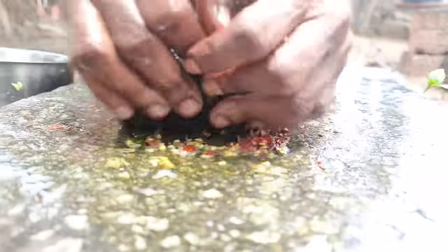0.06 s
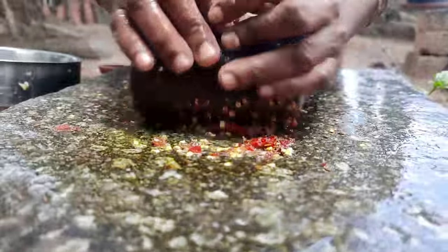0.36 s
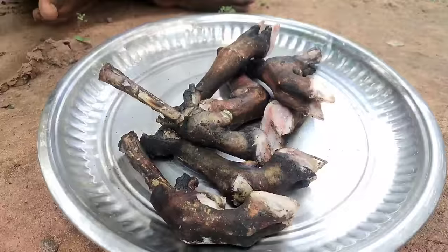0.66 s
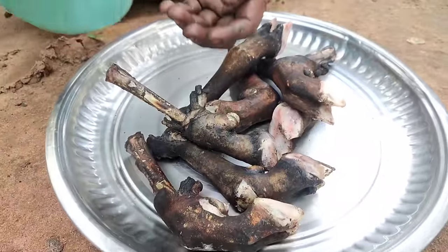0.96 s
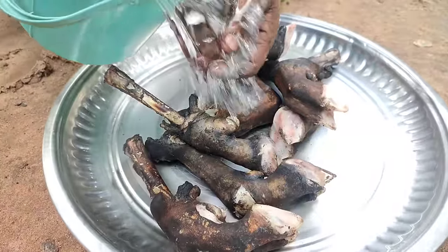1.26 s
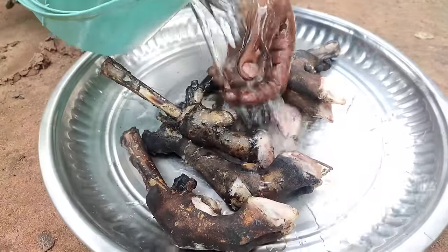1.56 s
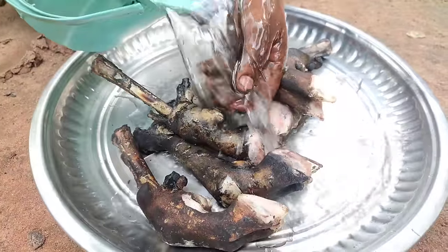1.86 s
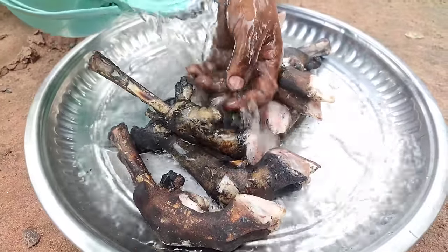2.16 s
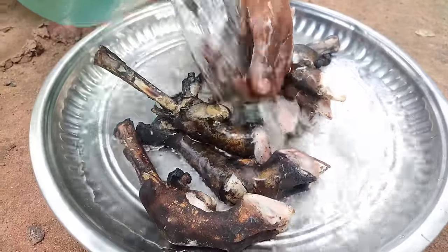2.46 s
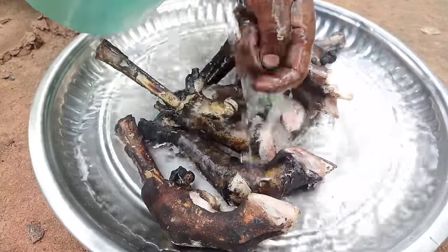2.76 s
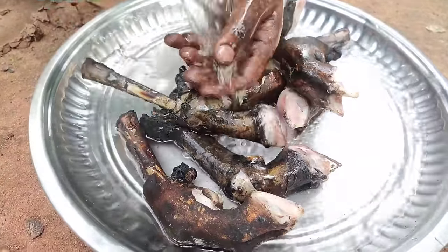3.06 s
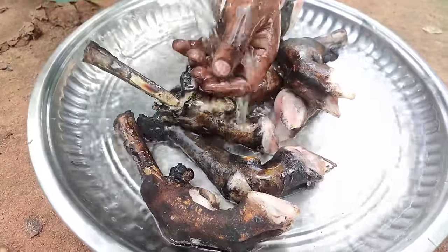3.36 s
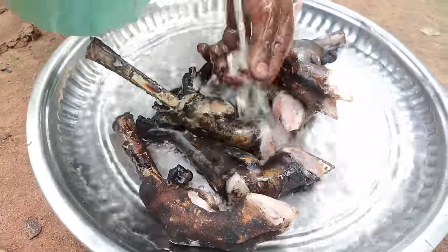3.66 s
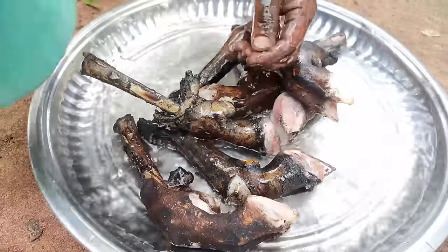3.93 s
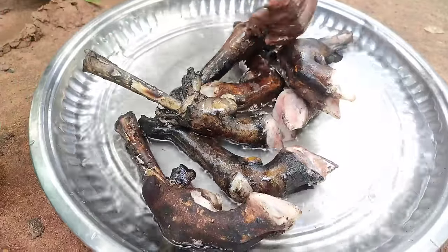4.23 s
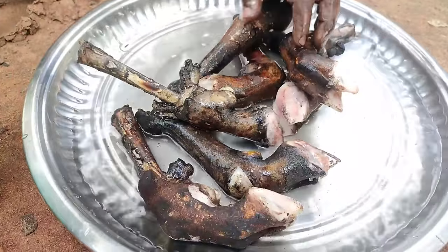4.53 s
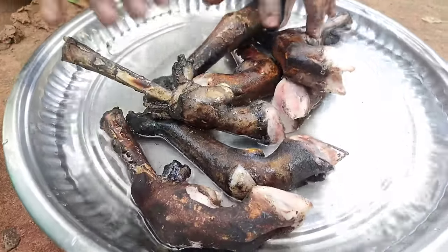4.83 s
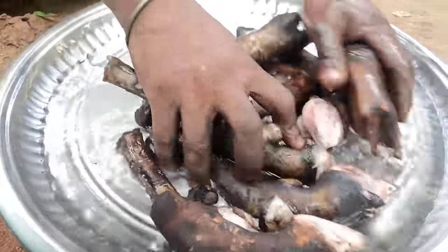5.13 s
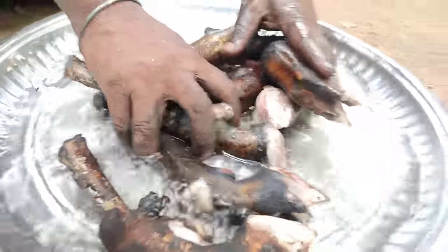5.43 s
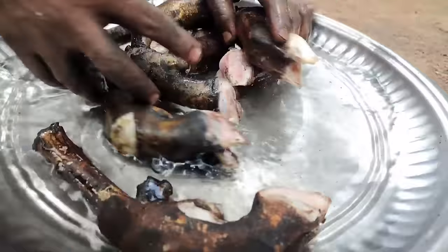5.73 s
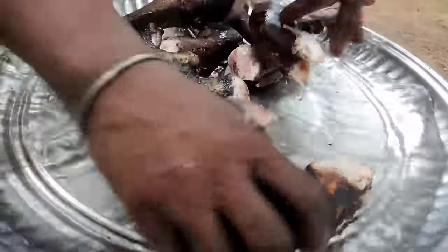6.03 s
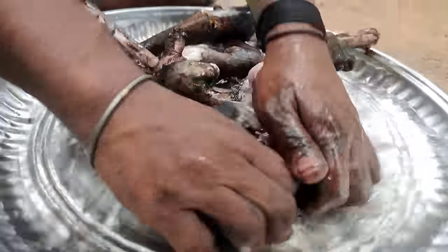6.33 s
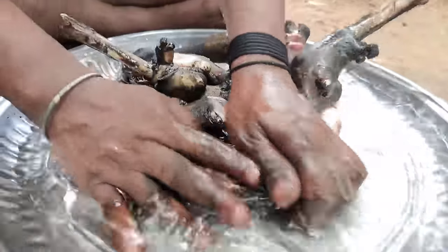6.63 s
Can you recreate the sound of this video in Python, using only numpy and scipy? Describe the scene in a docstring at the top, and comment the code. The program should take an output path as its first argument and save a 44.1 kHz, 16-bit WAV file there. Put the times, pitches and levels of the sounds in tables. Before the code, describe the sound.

For the first 0.7 seconds, a hand stone grinds wet spices on a slab: about four quick, gritty strokes with a low rumble and soft bumps. A lull follows, with a light tap and faint outdoor hiss. At about 1.4 seconds, water starts pouring from a jug over a hand and meat in a wide steel plate, close and slightly to the right, with bright splashing, sharp drop ticks and bubbling. It eases near 3 seconds, resumes in uneven spurts and ends in a few plops just before 4 seconds. Quieter drips, soft squelches and light metallic taps follow. From 5 seconds to the end, near 7, hands shove the bony pieces through the shallow water, sloshing, squelching and knocking them against the plate, which thuds and rings briefly. A short juddering scrape comes at 5.5 seconds, with strong knocks around 5.2, 5.9, 6.5 and 6.8.

```python
"""First you hear a hand stone grinding wet spices on a slab outdoors: a few strokes of crunching grit.
Then water pours from a jug over a hand and meat on the bone in a wide steel plate. Drops splash, and
trapped air bubbles ring. The pour ends in a few plops. Hands shove the pieces through the shallow
water, so that they slide, squelch and knock, making the metal thud and ring."""
import sys
import numpy as np
from scipy import signal
from scipy.fft import rfft, irfft, next_fast_len
from scipy.io import wavfile
from scipy.ndimage import uniform_filter1d

SR = 44100
rng = np.random.default_rng(int(sys.argv[2]) if len(sys.argv) > 2 else 0)


def log_audio(samples):
    """Write samples as a 16-bit WAV file to the path given in sys.argv[1]."""
    # one column per channel
    frames = np.atleast_2d(samples).T
    # limit to full scale, then quantise
    limited = np.clip(frames, -1, 1)
    pcm = np.round(limited * 32767).astype(np.int16)
    wavfile.write(sys.argv[1], SR, pcm)


N = 303849
TIME = np.arange(N) / SR


def amp(db):
    """Turn decibels into a gain. Below, fade_s is the time a sound takes to fall by 60 dB."""
    return 10 ** (np.asarray(db) / 20)


def rms_one(x):
    """Scale a sound so that its average level (rms) is 1."""
    return x / np.sqrt(np.mean(x ** 2) + 1e-20)


def crest_one(x, size=400):
    """Scale a burst so that its loudest moment has rms 1."""
    return x / np.sqrt(uniform_filter1d(np.mean(x ** 2, axis=0), size).max() + 1e-20)


def at_hz(points, hz):
    """Read a table of (pitch_hz, level_db) between its rows."""
    pitch_hz, level_db = np.transpose(points)
    return np.interp(np.log(hz + 1), np.log(pitch_hz), level_db)


def colour(x, spectrum, size=2048):
    """Give a sound the tone in a table, using a minimum-phase filter; rms 1."""
    cepstrum = irfft(np.log(amp(at_hz(spectrum, np.fft.rfftfreq(size, 1 / SR)))))
    cepstrum[1:size // 2] *= 2
    cepstrum[size // 2 + 1:] = 0
    response = irfft(np.exp(rfft(cepstrum)))
    return rms_one(signal.oaconvolve(x, response[None], axes=1)[:, :x.shape[1]])


def keep_band(x, hz, kind, order=4):
    """Keep the low part, the high part or one band of a sound."""
    return signal.sosfilt(signal.butter(order, hz, kind, fs=SR, output="sos"), x)


def pan(left_db):
    """Left and right gains; left_db is how much louder the left side is."""
    sides = amp(np.outer([1, -1], left_db) / 2)
    return sides / np.sqrt(np.mean(sides ** 2, axis=0))


def add(out, start_s, sound):
    start = max(round(start_s * SR), 0)
    out[:, start:start + sound.shape[1]] += sound[:, :max(N - start, 0)]


def held(start_s, length_s, rise_s, fade_s):
    """A gain that rises before start_s, stays full for length_s, then fades."""
    outside = np.maximum(start_s - TIME, 0) / rise_s + np.maximum(TIME - start_s - length_s, 0) / fade_s
    return amp(-60 * np.minimum(outside, 3))


def drift(rate_hz, size=40):
    """A slow random wobble with rms 1."""
    pole = np.exp(-2 * np.pi * size * rate_hz / SR)
    slow = signal.lfilter([1], [1, -2 * pole, pole * pole], rng.standard_normal(N // size + 500))[498:]
    return np.interp(np.arange(N) / size, np.arange(len(slow)), rms_one(slow))


def crackle(per_s, clump_db):
    """Tiny random clicks that swell in clumps, each with its own strength left and right."""
    clicks = rng.random(N) < per_s / SR
    return rms_one(clicks * amp(clump_db * drift(19.6)) * rng.standard_normal((2, N)))


def short_echo(x, fade_s):
    """Nearby things, like the plate's rim and the meat, scatter a sound for some milliseconds."""
    t = TIME[:SR // 20]
    scatter = rng.standard_normal((2, len(t))) * amp(-60 * t / fade_s) * (t > .0005)
    return signal.oaconvolve(x, rms_one(scatter) / np.sqrt(len(t)), axes=1)[:, :N]


# Tone of the outdoor murmur and of the hiss: pitch_hz, level_db
MURMUR_TONE = [(20, 4.5), (45, -2), (75, -2), (115, 0), (170, -5), (230, -5.5), (300, -8), (400, -15.5),
               (700, -21), (1200, -29.5), (3000, -26.5), (14000, -43)]
HISS_TONE = [(500, -29), (1200, -10), (2500, -9.5), (4500, -1.5), (7200, 1), (8600, -4.5), (10500, -1),
             (14000, -10)]
# Moments when the hiss swells: peak_s, level_db
HISS_SWELLS = [(.69, -59), (.86, -53.5), (1.13, -55.5), (1.35, -55)]


def open_air(swell_s=0.071):
    """The low murmur of the open air, and a soft hiss that swells a few times."""
    murmur, hiss = rng.standard_normal((2, 2, N))
    swells = sum(amp(db) * np.exp(-((TIME - peak_s) / swell_s) ** 2) for peak_s, db in HISS_SWELLS)
    return amp(-57) * colour(murmur, MURMUR_TONE) + np.hypot(amp(-67), swells) * colour(hiss, HISS_TONE)


# Tone of the heavy stone: pitch_hz, level_db
STONE_TONE = [(30, -9), (60, -18), (105, 3), (160, -4), (250, -3), (340, -14), (450, -21), (900, -21),
              (1800, -27), (4000, -44)]
# Tone of the crunching, with a narrow gap near 2 kHz: pitch_hz, level_db
CRUNCH_TONE = [(300, -26.5), (800, -13.5), (1400, -27), (1650, -13), (1950, -45), (2150, -6), (2550, -1.5),
               (3050, -3.5), (5000, -2.5), (6900, -0.5), (8300, -8), (11000, -12), (14000, -12.5)]
# Strokes of the hand stone: start_s, length_s, grit_db, rasp_db, rumble_db
STONE_STROKES = [(-.08, 0.13, -36, -40, -47), (0.148, 0.17, -38.5, -38, -49.5),
                 (0.393, 0.16, -41.5, -57, -45), (0.613, 0.061, -44, -52.5, -47.5)]
# The stone bumps on the slab: start_s, level_db
STONE_BUMPS = [(0.0, -42.5), (0.038, -52), (0.179, -40), (0.306, -47.5), (.387, -47.5), (0.484, -44),
               (.658, -42)]


def grinding(bump_fade_s=0.078):
    """The stone crushes wet grit, cracks coarse grains, rumbles over the slab and sometimes bumps."""
    grit, rasp, rumble = 0, 0, 0
    for start_s, length_s, grit_db, rasp_db, rumble_db in STONE_STROKES:
        off_centre = np.clip(2 * (TIME - start_s) / length_s - 1, -1, 1)
        press = held(start_s, length_s, rise_s=0.12, fade_s=0.056)
        press *= amp(-6 * off_centre ** 2)  # the hand presses hardest in mid-stroke
        grit += amp(grit_db) * press
        rasp += amp(rasp_db) * press ** 2
        rumble += amp(rumble_db) * press ** (1 / 1.04)  # lingers a little longer than the grit
    rolling = colour(crackle(per_s=1200, clump_db=0), STONE_TONE)
    grains = colour(crackle(per_s=26000, clump_db=0.5), CRUNCH_TONE)
    coarse = colour(short_echo(crackle(per_s=320, clump_db=3), fade_s=0.011), CRUNCH_TONE)
    # Where the paste is thin, stone rasps on stone.
    bare_stone = rms_one(keep_band(crackle(per_s=2000, clump_db=8), [5950, 7200], "band", order=2))
    out = rumble * rolling + grit * (grains + amp(-5.5) * coarse) + rasp * bare_stone
    t = TIME[:SR // 6]
    for start_s, db in STONE_BUMPS:
        force = rng.standard_normal((1, len(t))) * amp(-60 * t / bump_fade_s)
        add(out, start_s, amp(db) * crest_one(keep_band(colour(force, STONE_TONE), 355, "low")))
    return out


# The wet steel plate's own tones: pitch_hz, level_db, fade_s (before damping shortens it)
PLATE_TONES = [(60, -12, 0.052), (139, -2, 0.025), (164, -5.5, 0.073), (243, -10.5, 0.21),
               (268.6, -6, 0.17), (422, -10.5, 0.13), (527, -16, 0.19), (666, -15, 0.39),
               (720, -7.5, 0.086), (840, -9.5, 0.27), (856, 2, 0.072), (1004, -8, 0.077), (1135, 13, 0.023),
               (1090, 8, 0.013), (1090, -3.5, 0.063), (1252, 7, 0.057), (1253, 3, 0.06), (1392, 2.5, 0.039),
               (1516, 6.5, 0.018), (1650, -2.5, 0.11), (1700, 10, 0.014), (1745, -3, 0.14),
               (2108, 0.5, 0.11), (1980, 7, 0.028), (2253, -4.5, 0.12), (2550, -6, 0.1), (3400, 3.5, 0.049),
               (4000, -7, 0.13)]


def plate_ring(detune, uneven_db, damping):
    """One touch rings the plate: the spot sets each tone's strength, the water bends its pitch."""
    hz, level_db, fade_s = np.transpose(PLATE_TONES)[:, :, None]
    t = TIME[:SR // 4]
    bend, strength, start_turns, mismatch = rng.standard_normal((4, len(PLATE_TONES), 1))
    decay = amp(level_db + uneven_db * strength - 60 * damping * t / fade_s)
    phase = 2 * np.pi * (hz * (1 + detune * bend) * t + start_turns)
    skew = mismatch * hz / 800  # higher tones reach left and right less in step
    return np.array([np.sum(decay * np.sin(phase + lag), axis=0) for lag in (0, skew)])


# Clear notes from the plate: start_s, pitch_hz, level_db, fade_s, pitch_fall_hz_per_s
PLATE_NOTES = [(4.316, 548, -52, 0.099, 0), (4.468, 587, -57.5, .2, 0), (4.509, 604, -47, 0.08, 0),
               (5.031, 1090, -39, 0.068, 0), (5.104, 1090, -47, 0.13, 0), (5.151, 1300, -32, 0.064, 0),
               (5.16, 1150, -38, .05, 0), (5.22, 896, -42, 0.15, 4), (5.799, 1300, -45.5, 0.3, 2),
               (5.818, 1638, -39.5, 0.3, 398), (5.821, 1330, -31.5, 0.055, 0), (5.82, 244, -44.5, 0.16, 0),
               (5.924, 1302, -30, 0.13, 154), (5.924, 422, -35.5, 0.082, 0), (5.924, 259, -34.5, 0.1, 0),
               (5.924, 1646, -44.5, 0.28, 0), (5.935, 810, -57, 0.27, 0), (5.924, 1745, -38, 0.1, 0),
               (5.935, 680, -48, 0.33, -3), (6.464, 849, -43.5, 0.17, -2), (6.464, 1247, -47, .14, 0),
               (6.5, 730, -30.5, 0.023, 0), (6.82, 1210, -36, 0.033, 0), (6.824, 847, -40, 0.12, 0),
               (6.824, 934, -37, 0.061, 0), (6.824, 546, -36, 0.018, 0)]


def plate_singing(rise_s=0.0034):
    """Single tones ring on after a touch; some slide in pitch as water shifts over the steel."""
    out, t = np.zeros((2, N)), TIME[:SR // 3]
    for start_s, hz, db, fade_s, fall in PLATE_NOTES:
        level = amp(db - 60 * t / fade_s) * (1 - np.exp(-t / rise_s))
        phase = 2 * np.pi * (hz - fall * t / 2) * t
        add(out, start_s, level * np.sqrt(2) * np.sin(phase + np.array([[0], [hz / 900]])))
    return out


# Tone of a wet slap or pop: pitch_hz, level_db
SLAP_TONE = [(400, -33), (1200, -4), (2500, 4.5), (4000, 8), (5500, 4.5), (7400, 8), (8600, -5.5),
             (10500, 1.5), (14000, -7.5)]
# Pieces hit the plate: start_s, thud_db, ring_db, slap_db, clatter_fade_s, rise_s
MEAT_KNOCKS = [(.838, -48, -59, -73, 0.043, 0.0037), (.85, -85, -56.5, -62, 0.1, 0.0021),
               (0.884, -59, -64, -57.5, 0.51, 0.0029), (4.307, -65, -45, -43, 0.07, 0.01),
               (4.419, -71, -46.5, -44.5, 0.11, 0.0042), (4.504, -66, -48.5, -50, 0.074, 0.008),
               (4.804, -61, -53.5, -72, .029, 0.0036), (4.83, -71, -56, -72, 0.043, 0.0042),
               (5.029, -42.5, -41, -50, 0.08, 0.002), (5.048, -62, -46, -41.5, 0.082, 0.0019),
               (5.057, -57, -47, -38.5, 0.094, .003), (5.069, -51, -52, -38, 0.063, 0.0043),
               (5.097, -56, -44.5, -48, 0.33, 0.0022), (5.1478, -69, -38, -34.5, .06, 0.0025),
               (5.159, -52, -40.5, -39, 0.049, 0.0033), (5.208, -60, -51, -38.5, 0.094, 0.0083),
               (5.294, -54, -50, -40.5, 0.035, 0.0037), (5.324, -51, -77, -71, 0.035, 0.0028),
               (5.374, -55, -50, -65, 0.041, 0.0038), (5.735, -46.5, -52, -60, 0.04, .002),
               (5.817, -51, -44, -50.5, 0.34, 0.003), (5.9224, -37.5, -39, -44.5, 0.21, 0.0019),
               (5.93, -52, -40, -54, 0.1, 0.0025), (6.026, -60, -48.5, -51, 0.19, 0.003),
               (6.3812, -66, -43, -36, 0.13, 0.0021), (6.4612, -44.5, -38, -40, 0.25, 0.0026),
               (6.498, -54, -46.5, -52, 0.052, 0.0034), (6.526, -66, -64, -42, 0.049, 0.004),
               (6.602, -53, -57, -47.5, 0.028, 0.0023), (6.627, -50.5, -51, -58, 0.081, 0.0031),
               (6.817, -45.5, -40, -34.5, 0.06, .009)]


def knocking(heap_parted_s=5, thud_fade_s=0.16):
    """Each knock builds quickly to a tap and clatters: the plate thuds and rings, water slaps out."""
    out, t = np.zeros((2, N)), TIME[:SR // 3]
    for start_s, thud_db, ring_db, slap_db, fade_s, rise_s in MEAT_KNOCKS:
        tap = np.arange(len(t)) == round(rise_s * SR)
        contact = (1 - np.exp(-(t / rise_s) ** 4)) * amp(-60 * t / fade_s)
        force, squirt = contact * rng.standard_normal((2, 2, len(t)))
        blow = rms_one(force[:1]) / np.sqrt(len(t)) + amp(-6.5) * tap
        damping = 1.77 if start_s < heap_parted_s else 1  # heaped meat muffles the plate until parted
        plate = plate_ring(detune=0.0085, uneven_db=5.5, damping=damping)
        body = signal.fftconvolve(blow, plate, axes=1)[:, :len(t)]
        # The meat's weight chokes the low tones.
        thud = crest_one(keep_band(body, 586, "low") * amp(-60 * t / thud_fade_s))
        clatter = crest_one(keep_band(force, [550, 2400], "band", order=2))
        wetness_db = min(slap_db - ring_db, 0)  # bare bone rings the plate more cleanly than wet flesh
        ring = crest_one(crest_one(keep_band(body, 480, "high")) + amp(wetness_db) * clatter)
        slap = crest_one(colour(squirt, SLAP_TONE))
        add(out, start_s, amp(thud_db) * thud + amp(ring_db) * ring + amp(slap_db) * slap * pan(1))
    return out


# Tone of meat rubbing on metal: pitch_hz, level_db
RUB_TONE = [(450, -54), (850, 9), (1000, 1), (1280, 10.5), (1700, -7), (2250, 4.5), (3000, -5),
            (5000, -7.5), (7500, -17), (12000, -12.5)]


def dragging(slips_per_s=105):
    """One piece is dragged over the ribbed metal and judders as it sticks and slips."""
    turns = np.cumsum(slips_per_s * (1 + 0.1 * drift(18))) / SR
    judder = amp(2.1 * np.cos(2 * np.pi * turns))
    pull = amp(-42) * held(start_s=5.495, length_s=0.15, rise_s=0.022, fade_s=0.24)
    return pull * colour(judder * rng.standard_normal((2, N)), RUB_TONE)


# Tone of the squelch: pitch_hz, level_db
SQUELCH_TONE = [(300, -8), (700, -45), (1300, 1), (2400, 4.5), (4000, 4.5), (5500, 4), (7300, 5.5),
                (8600, -1.5), (10500, 1), (14000, -1)]
# Hands push the pieces through the water: start_s, length_s, slide_db, squelch_db, left_db
HAND_SHOVES = [(3.985, 0.54, -77, -62, 0.5), (4.47, 0.035, -56, -57, 12), (4.652, 0.31, -70.5, -63, 2),
               (5.092, 0.088, -55.5, -48.5, -2), (5.211, 0.032, -47, -39, 0),
               (5.402, 0.11, -54.5, -49.5, -0.5), (5.522, 0.12, -78, -46, 4), (5.738, 0.12, -50.5, -50, 3),
               (6.114, 0.5, -55.5, -50, 4), (6.729, 0.12, -52, -48.5, 2)]


def shoving(cloud):
    """Skin and bone slip on the metal and muffle it; the film of water squelches, froths and pops."""
    slide, squelch = 0, 0
    for start_s, length_s, slide_db, squelch_db, left_db in HAND_SHOVES:
        push = held(start_s, length_s, rise_s=0.26, fade_s=0.23)
        slide += amp(slide_db) * push
        squelch += amp(squelch_db) * push * pan(left_db)
    pressed_plate = plate_ring(detune=.003, uneven_db=1, damping=2.2)
    slips = crackle(per_s=1500, clump_db=2)
    metal = rms_one(signal.oaconvolve(slips, pressed_plate, axes=1)[:, :N])
    froth = colour(crackle(per_s=7500, clump_db=1) + amp(-12.5) * cloud, SQUELCH_TONE)
    pops = colour(short_echo(crackle(per_s=55, clump_db=3), fade_s=0.015), SLAP_TONE)
    return slide * metal + squelch * (froth + amp(-10) * pops)


TOP_HZ = 14300  # upper edge of the snaps and of the whole sound
# Drops and wet skin snap close by: start_s, peak_db, pitch_hz, fade_s, left_db
WET_SNAPS = [(1.359, -27.5, 3580, 0.04, -10), (1.617, -22, 3180, 0.048, -7), (1.673, -22, 6240, 0.027, -7),
             (1.889, -23, 6400, 0.014, -6), (1.952, -17, 4270, 0.02, -15), (2.018, -31, 10200, .015, -15),
             (2.099, -24, 6500, .025, -6), (2.2, -21, 3400, 0.018, -9), (2.224, -29, 6640, 0.014, -8),
             (2.473, -21.5, 4800, 0.013, -12), (2.555, -24.5, 2800, 0.032, -7),
             (2.827, -24.5, 6700, .02, -7), (2.8602, -17, 5350, 0.019, -8), (2.98, -34, 8000, .03, 2),
             (3.148, -23.5, 7600, 0.023, -4), (3.148, -46, 1800, .03, -3), (3.168, -27, 6000, 0.051, -3),
             (3.193, -26.5, 5300, 0.13, -4), (3.3, -27, 4500, 0.024, -9), (3.453, -41, 11500, .015, 0),
             (3.649, -18, 3900, 0.013, -20), (3.795, -21, 3830, .025, -4), (3.849, -27, 4600, 0.032, -6),
             (3.882, -28, 3000, 0.028, -1), (3.952, -31.5, 6700, 0.026, -6), (4.409, -34, 3400, 0.026, -2),
             (4.66, -44, 4500, 0.058, -2), (5.098, -31, 2600, .012, -7), (5.15, -17, 8400, 0.022, -11),
             (5.503, -18, 8000, 0.02, -10), (6.2133, -31.5, 1970, 0.031, 12), (6.309, -38, 2200, 0.022, -3),
             (6.334, -44, 1700, .025, -2), (6.3843, -17.5, 10400, .014, -4), (6.465, -22, 2430, 0.009, 2),
             (6.591, -36, 1800, .03, 0), (6.675, -40, 1800, .02, 0), (6.769, -32, 1200, .03, 3),
             (6.788, -34, 1340, .03, 6)]


def snapping(spread=1.364, rise_s=0.00054):
    """A film of water bursts: a sharp tick about an octave wide."""
    out, t = np.zeros((2, N)), TIME[:SR // 20]
    for start_s, db, hz, fade_s, left_db in WET_SNAPS:
        shape = amp(-60 * t / fade_s) * (1 - np.exp(-(t / rise_s) ** 2))
        burst = rng.standard_normal((2, len(t))) * shape
        tick = keep_band(burst, [hz / spread, min(hz * spread, TOP_HZ)], "band", order=2)
        add(out, start_s, amp(db) * pan(left_db) * tick / np.abs(tick).max(axis=1, keepdims=True))
    return out


def bubble(hz, cycles, skew, chirp=0.014, swell=0.96):
    """Trapped air rings: it swells, rises in pitch and dies. Skew puts left and right out of step."""
    turns = np.arange(int(cycles * SR / hz) + 2) * hz / SR
    shape = (1 - np.exp(-(turns / swell) ** 2)) * amp(-60 * turns / cycles)
    phase = 2 * np.pi * turns * (1 + chirp * turns / cycles)
    return shape / shape.max() * np.sin(phase + np.array([[0], [skew]]))


def bubble_cloud(spread_db, cycles, count=9000):
    """Bubbles of all sizes ring at random places and moments; rms 1."""
    out = np.zeros((2, N))
    for when, size, strength, life, side, skew in rng.random((count, 6)):
        hz = 550 + 8000 * size ** 1.212
        gain = amp(spread_db * min(-np.log(1 - strength), 3.5)) * hz ** 0.46
        ring = bubble(hz, cycles * (.5 + life), 2 * np.pi * skew)
        add(out, when * N / SR, gain * pan(16 * (side - .5)) * ring)
    return rms_one(out)


def pool_bubbles(per_s, low_hz, high_hz, cycles, spread_db):
    """Bubbles within one range of pitch come at random, each ringing on its own; rms 1."""
    out = np.zeros((2, N))
    for when, size, strength, side in rng.random((int(per_s * N / SR), 4)):
        hz = low_hz * (high_hz / low_hz) ** size
        ring = bubble(hz, cycles, skew=np.pi * (side - .5), swell=1.5)
        add(out, when * N / SR, amp(spread_db * strength) * ring)
    return rms_one(out)


# Bubbles that stand out alone: start_s, peak_db, pitch_hz, ring_cycles, left_db
LONE_BUBBLES = [(.626, -32, 2600, 52, 9), (1.3597, -25.5, 3850, 15, -5), (1.362, -25, 7160, 87, -8),
                (1.702, -29, 6040, 35, -9), (1.765, -30.5, 2250, 53, -5), (1.893, -30, 1400, 22, -4),
                (1.936, -18.5, 3620, 10, -14), (1.974, -22, 2650, 11, -9), (1.987, -31, 1650, 17, -3),
                (2.083, -41, 710, 13, 0), (2.137, -20, 6600, 52, -8), (2.303, -22, 7160, 49, -6),
                (2.346, -34, 1650, 21, -1), (2.381, -30.5, 1700, 25, -7), (2.635, -32, 2560, 18, -7),
                (2.725, -23, 6450, 40, -10), (2.738, -35, 2140, 24, -4), (2.749, -25, 3560, 28, -4),
                (2.853, -30, 3800, 26, -4), (2.866, -24, 1720, 5.3, -7), (2.916, -36.5, 3040, 43, -5),
                (2.939, -32, 1240, 7.7, -3), (2.982, -31, 1510, 14, -9), (3.189, -28, 3670, 37, -8),
                (3.333, -28, 4600, 53, -19), (3.442, -35, 3640, 26, -2), (3.455, -30, 2100, 24, -5),
                (3.491, -23.5, 1500, 21, -1), (3.53, -29.5, 3020, 32, -2), (3.559, -28, 1730, 21, -10),
                (3.575, -29, 3670, 28, -10), (3.62, -31, 1500, 23, -3), (3.719, -32, 1200, 16, -10),
                (3.722, -25, 2960, 22, -5), (3.742, -19, 4400, 19, -5), (3.774, -24, 1650, 10, -5),
                (3.778, -31, 1860, 14, -2), (3.799, -30.5, 570, 32, 3.5), (3.803, -40, 515, 40, 5),
                (3.818, -35.5, 1750, 25, -7), (3.882, -29, 544, 21, 9), (3.882, -30, 885, 9.6, 2),
                (3.895, -26.5, 730, 6.5, 14), (4.069, -46, 3550, 23, -2), (4.423, -40.5, 537, 23, 11),
                (4.576, -41, 2970, 26, -2), (6.582, -36, 1290, 31, 5), (6.766, -28, 4700, 44, -1)]


def plopping(drips_from_s=2.5, drips_per_s=3.7, low_hz=2000, high_hz=6000):
    """Large bubbles ring out alone, among small random drips from the wet hand."""
    out, dripping_s = np.zeros((2, N)), N / SR - drips_from_s
    for start_s, db, hz, cycles, left_db in LONE_BUBBLES:
        ring = bubble(hz, cycles, skew=hz / 4000, swell=.5 + 0.053 * cycles)
        add(out, start_s, amp(db) * pan(left_db) * ring)
    for when, size, strength in rng.random((int(drips_per_s * dripping_s), 3)):
        hz = low_hz * (high_hz / low_hz) ** size
        drip = amp(-48 + 2 * strength) * bubble(hz, cycles=14, skew=hz / 4000)
        add(out, drips_from_s + when * dripping_s, drip)
    return out + amp(-4) * short_echo(out, fade_s=.035)


# The full stream plunges into the pool: start_s, length_s, level_db
PLUNGES = [(2.034, 0.043, -56), (2.335, 0.22, -57)]


def glugging(fade_s=0.24):
    """The plunging stream traps big, low bubbles."""
    plunge = sum(amp(db) * held(start_s, length_s, fade_s, fade_s) for start_s, length_s, db in PLUNGES)
    return plunge * pool_bubbles(per_s=78, low_hz=626, high_hz=780, cycles=21, spread_db=10)


def babbling():
    """While the pool is shallow, its bubbles are small and babble higher."""
    shallow = amp(-48) * held(start_s=1.72, length_s=0.246, rise_s=0.24, fade_s=0.24)
    return shallow * pool_bubbles(per_s=380, low_hz=1340, high_hz=1910, cycles=26, spread_db=13)


# Tone of splashing water: pitch_hz, level_db
SPLASH_TONE = [(210, -107), (350, -21.5), (556, -20), (629, -23.5), (818, -6.5), (1000, -9.5), (1540, -3),
               (1970, -3), (2990, 3), (3280, 3.5), (3600, 6), (6880, 7), (8810, -10.5), (10800, -9),
               (14000, -18)]
# Flow from the jug, tipped twice, with one list for each pour: time_s, level_db
JUG_POURS = [
    [(1.375, -42.5), (1.43, -41.5), (1.55, -29.5), (1.6, -35), (1.665, -37.5), (1.72, -36), (1.9, -36),
     (2.63, -35), (2.67, -38), (2.82, -37), (2.9, -46), (2.98, -41), (3.03, -53.5), (3.125, -57.5)],
    [(3.15, -41), (3.2, -46), (3.298, -43), (3.312, -35), (3.39, -42.5), (3.44, -37.5), (3.51, -48),
     (3.57, -38), (3.63, -42.5), (3.69, -30), (3.78, -43), (3.93, -42.5), (3.98, -60.5)],
]


def pouring(cloud, fill_s=0.055, wetting_s=0.21, edge_s=0.02):
    """The stream breaks into drops on hand and meat and drives bubbles into the pool that gathers."""
    flow, pooled = 0, 0
    for curve in JUG_POURS:
        times, level_db = np.transpose(curve)
        start_s, end_s = times[0], times[-1]
        edges = np.interp(TIME, [start_s - edge_s, start_s, end_s, end_s + edge_s], [0, 1, 1, 0])
        stream = edges * amp(np.interp(TIME, times, level_db))
        pool = 1 - np.exp(-np.maximum(TIME - start_s, 0) / fill_s)
        flow += stream
        pooled += stream * pool
    # The first water sprays more, until skin and steel are wet.
    first_water_s = JUG_POURS[0][0][0]
    dryness = np.exp(-((TIME - first_water_s) / wetting_s) ** 2)
    water = colour((1 - dryness) * cloud + amp(7) * crackle(per_s=8000, clump_db=2.5), SPLASH_TONE)
    bubbling = glugging() + babbling()
    gurgle = amp(-10) * pooled * rms_one(keep_band(water, 1786, "low"))
    splash = amp(-7) * flow * rms_one(keep_band(water, [2200, 8000], "band"))
    droplets = keep_band(crackle(per_s=6900, clump_db=4.5), 4600, "high")
    fizz = rms_one(keep_band(water, 7960, "high", order=6))
    spray = amp(-11 + 5 * dryness) * flow * rms_one(fizz + amp(-7.5) * droplets)
    fat_drops = pool_bubbles(per_s=190, low_hz=2124, high_hz=7070, cycles=42, spread_db=11)
    return bubbling + gurgle + splash + spray + amp(-11) * flow * fat_drops


# How wide the sound is (below 0 is narrower): pitch_hz, width_db
STEREO_WIDTH = [(25, 2), (70, -13.5), (280, -8.5), (550, -4.5), (1400, -2), (3000, 1), (15000, -0.5)]
# Which way the sound leans (below 0 is to the right): pitch_hz, left_db
STEREO_LEAN = [(200, -1.5), (700, -0.5), (1300, -1.5), (2400, -1.5), (4400, -6.5), (8000, -6.5),
               (15000, -7.5)]


def stereo_spread(x):
    """Most of the bass reaches both sides alike; the right side gets more treble."""
    size = next_fast_len(N, True)
    hz = np.fft.rfftfreq(size, 1 / SR)
    left, right = rfft(x, size)
    mid = left + right
    side = (left - right) * amp(at_hz(STEREO_WIDTH, hz))
    lean = amp(at_hz(STEREO_LEAN, hz) / 2)
    return irfft(np.array([(mid + side) * lean, (mid - side) / lean]), size)[:, :N] / np.sqrt(2)


def scene():
    """Grinding, then pouring, then washing the meat, all in the open air."""
    cloud = bubble_cloud(spread_db=4, cycles=34)
    hands = shoving(cloud) + dragging() + plate_singing() + knocking()
    mix = pouring(cloud) + hands + grinding() * pan(4.9) + open_air() * pan(1)
    return stereo_spread(mix) + plopping() + snapping()


def record(dry):
    """The highest treble is cut off steeply."""
    return signal.sosfilt(signal.ellip(10, .3, 80, TOP_HZ, fs=SR, output="sos"), dry)


dry = scene()
out = record(dry)
log_audio(out)
```